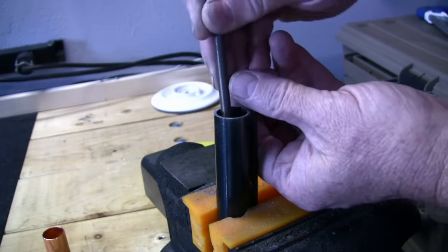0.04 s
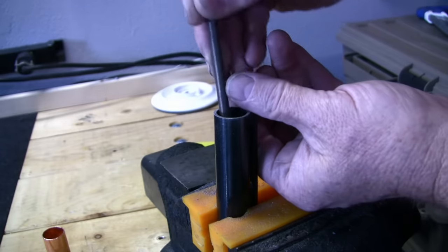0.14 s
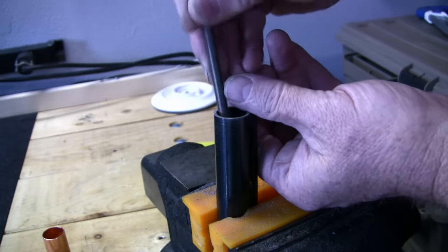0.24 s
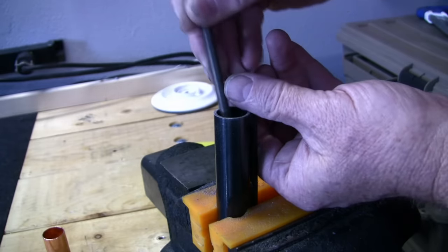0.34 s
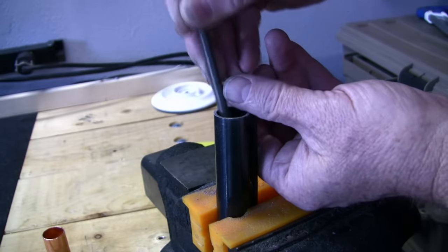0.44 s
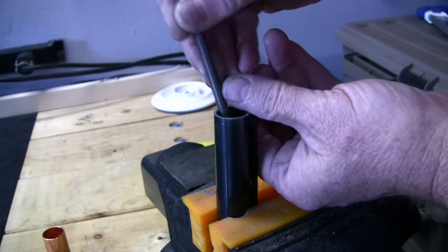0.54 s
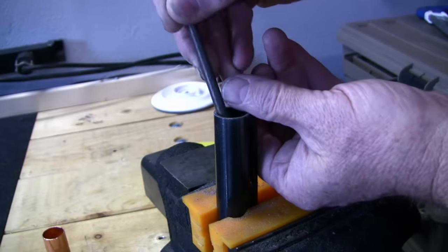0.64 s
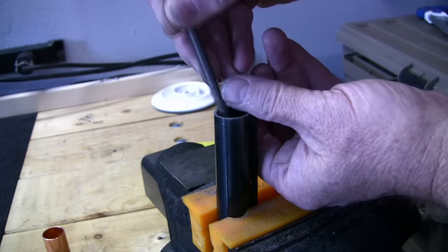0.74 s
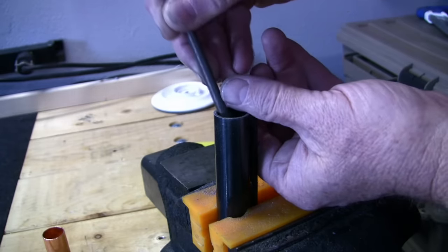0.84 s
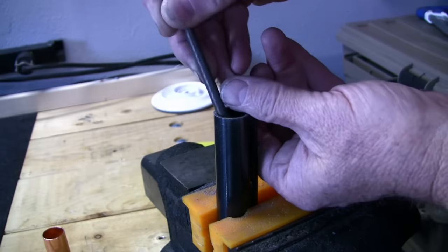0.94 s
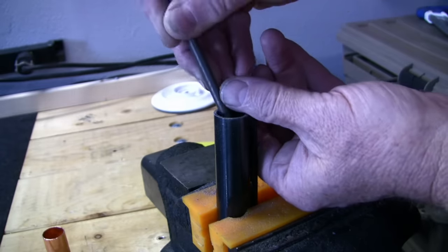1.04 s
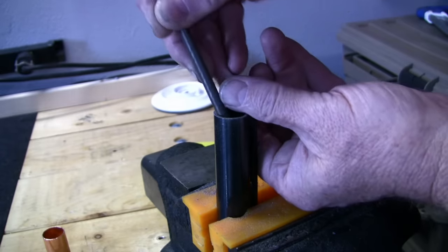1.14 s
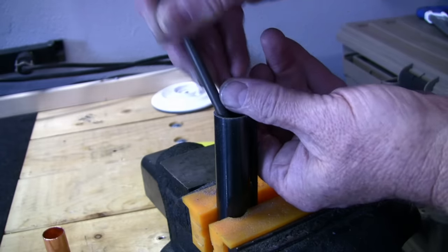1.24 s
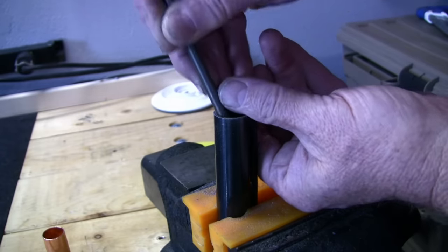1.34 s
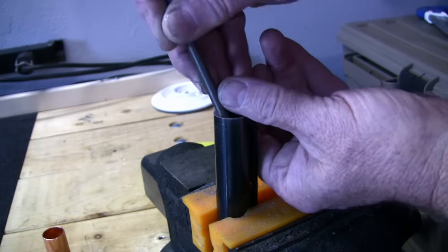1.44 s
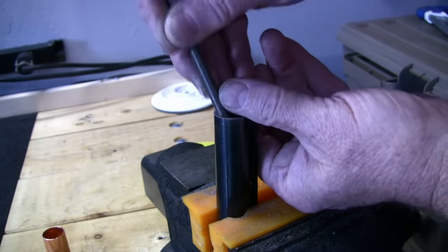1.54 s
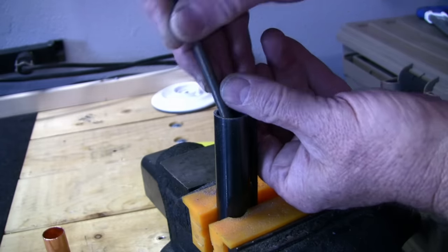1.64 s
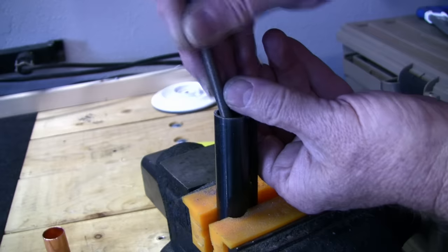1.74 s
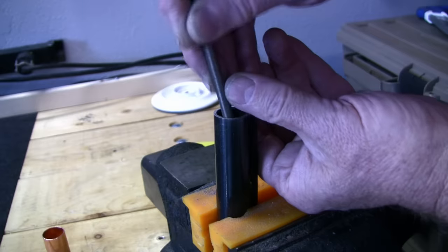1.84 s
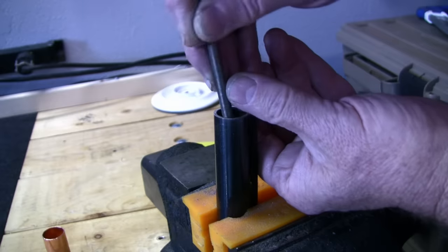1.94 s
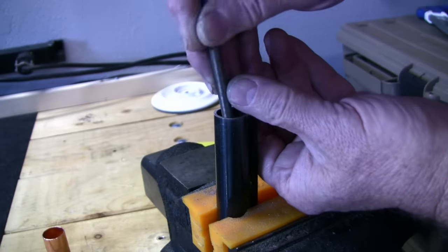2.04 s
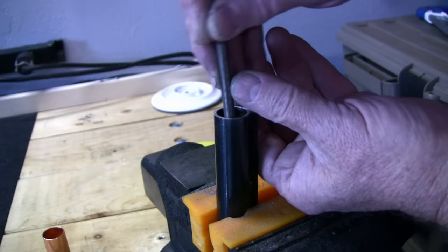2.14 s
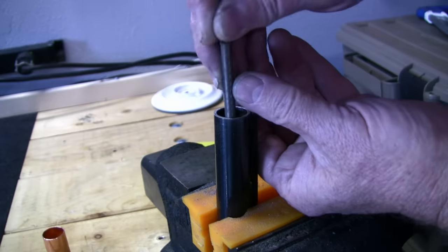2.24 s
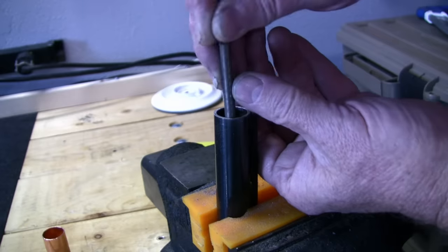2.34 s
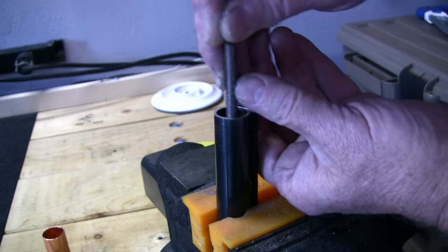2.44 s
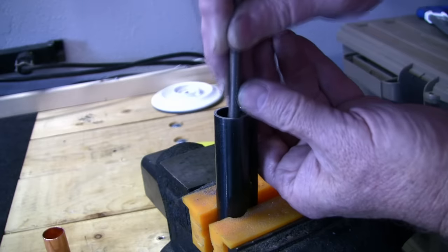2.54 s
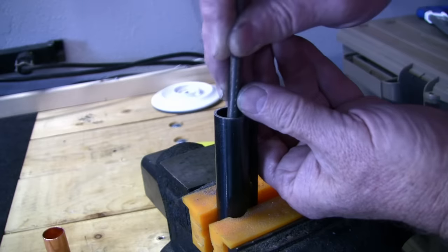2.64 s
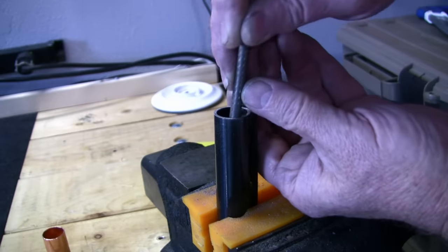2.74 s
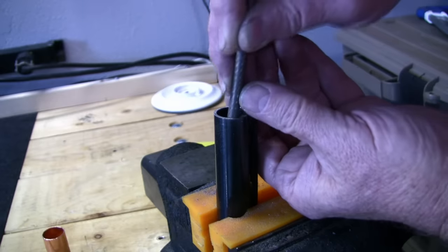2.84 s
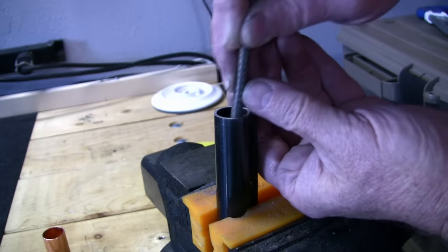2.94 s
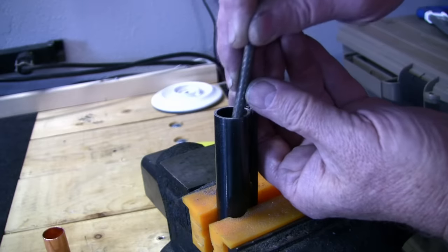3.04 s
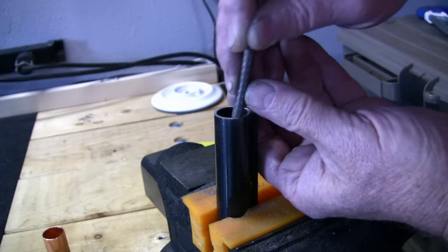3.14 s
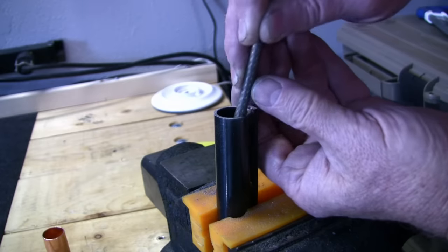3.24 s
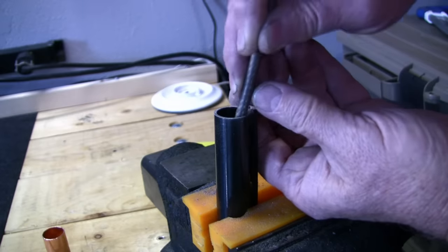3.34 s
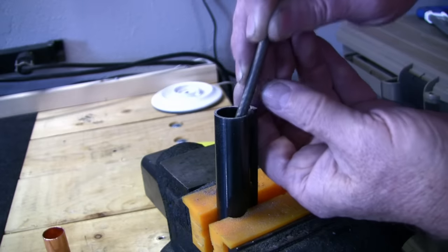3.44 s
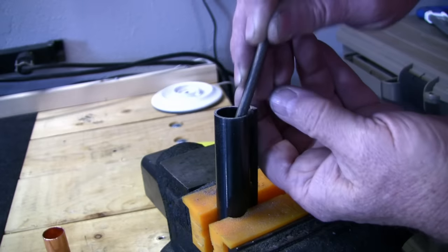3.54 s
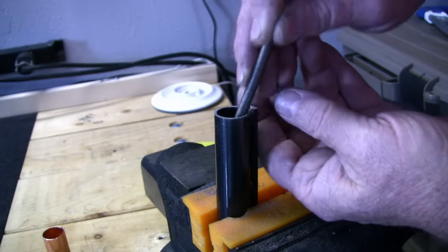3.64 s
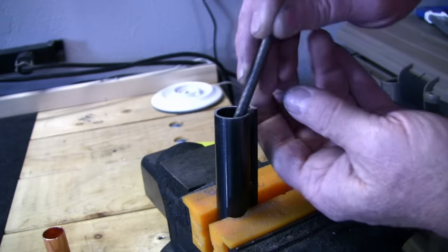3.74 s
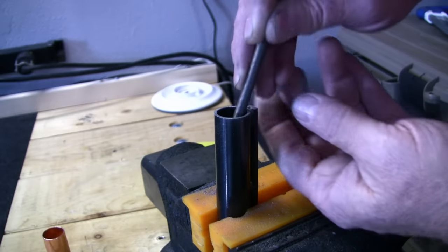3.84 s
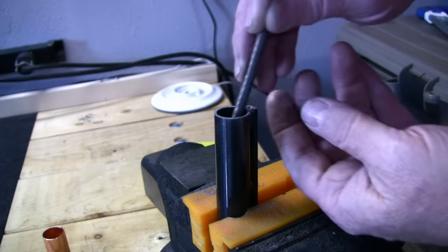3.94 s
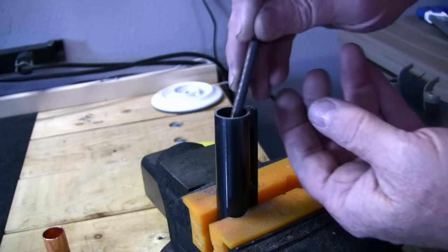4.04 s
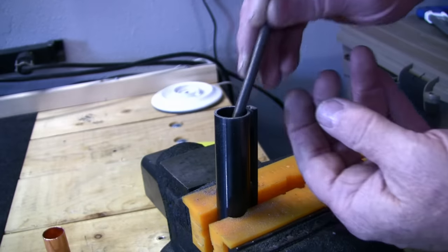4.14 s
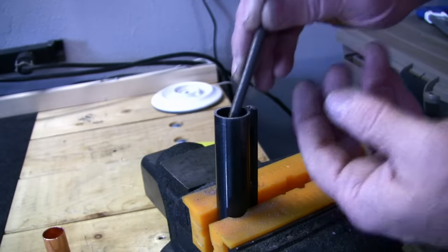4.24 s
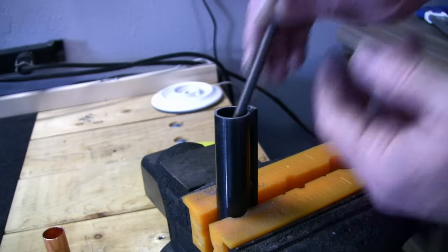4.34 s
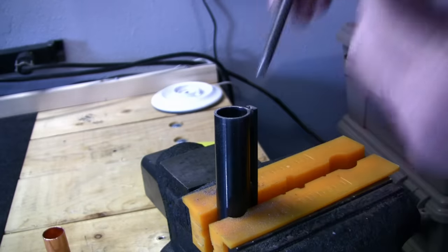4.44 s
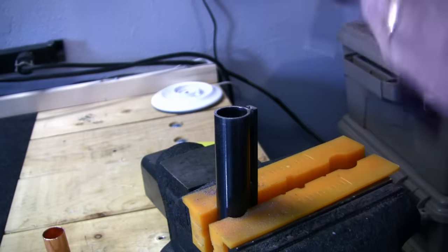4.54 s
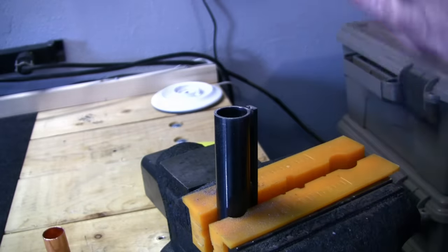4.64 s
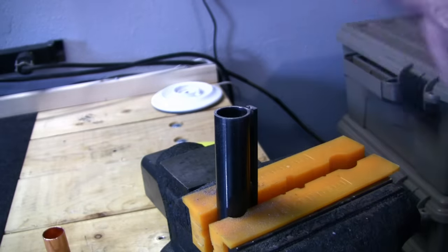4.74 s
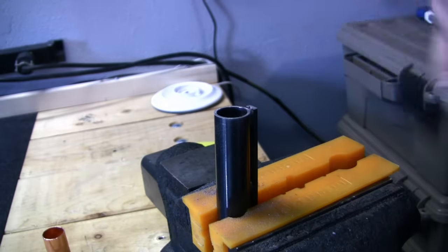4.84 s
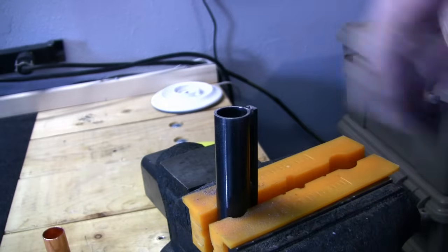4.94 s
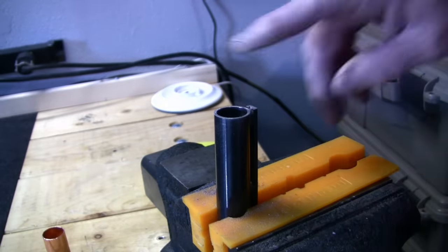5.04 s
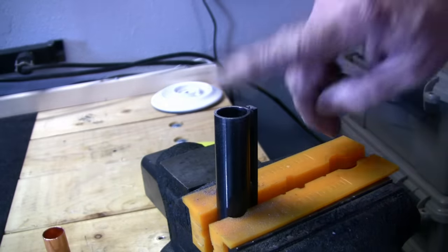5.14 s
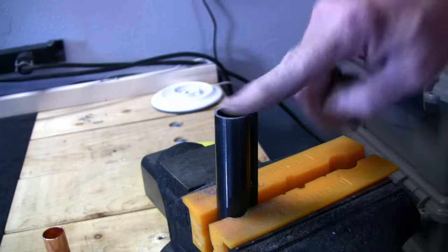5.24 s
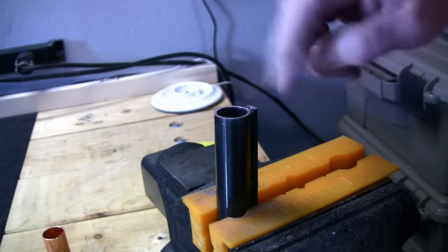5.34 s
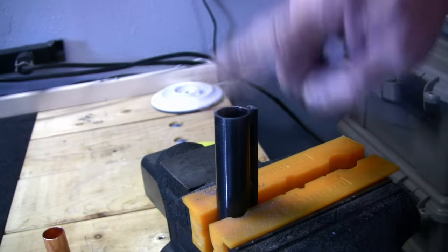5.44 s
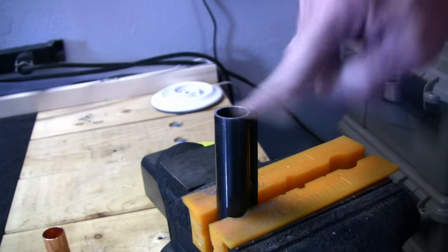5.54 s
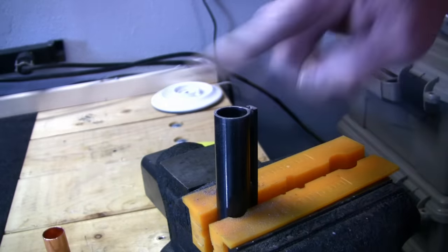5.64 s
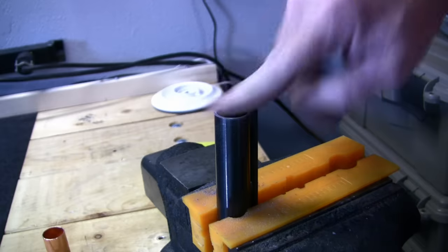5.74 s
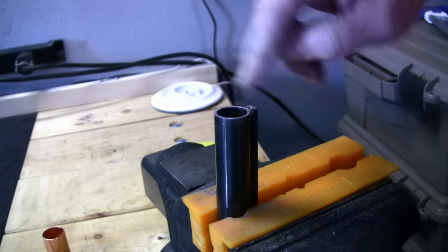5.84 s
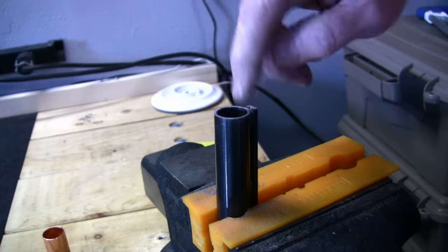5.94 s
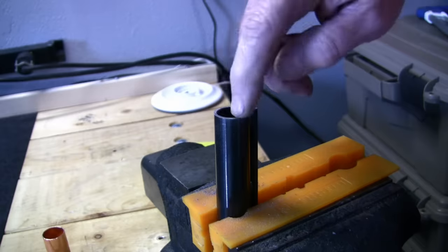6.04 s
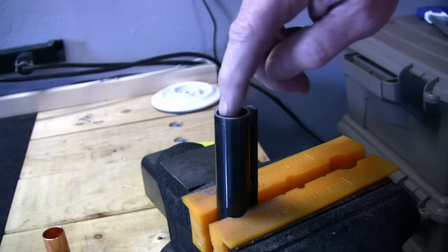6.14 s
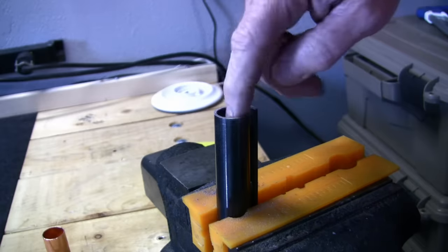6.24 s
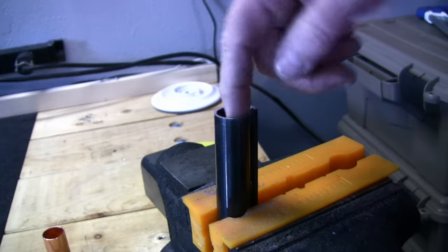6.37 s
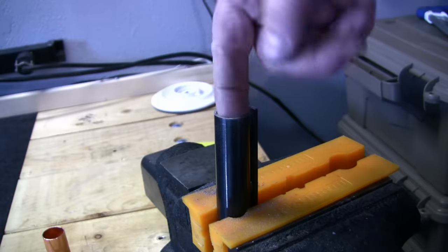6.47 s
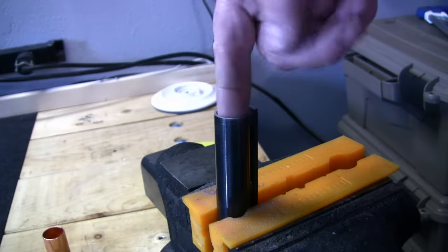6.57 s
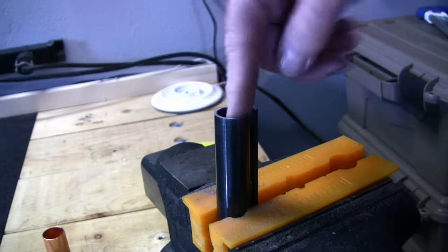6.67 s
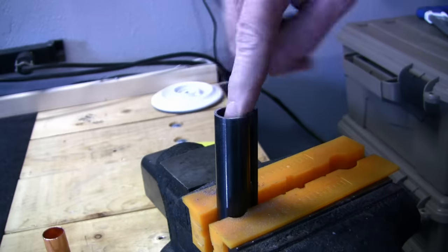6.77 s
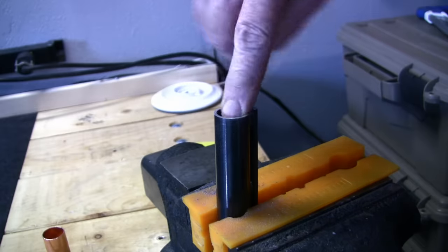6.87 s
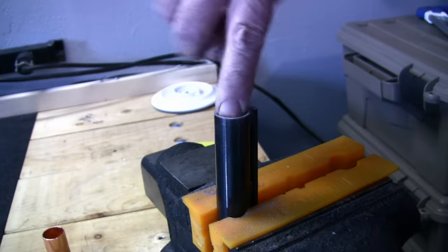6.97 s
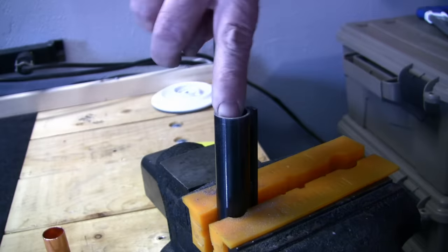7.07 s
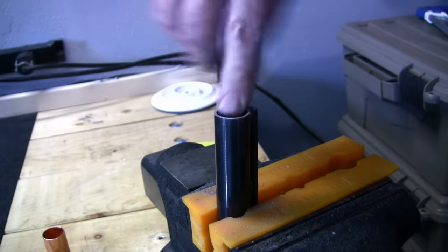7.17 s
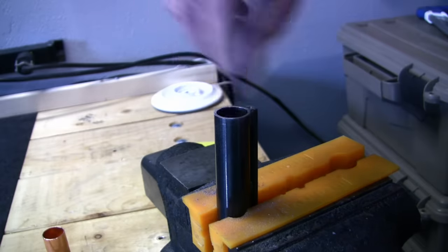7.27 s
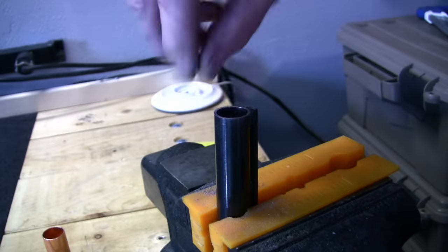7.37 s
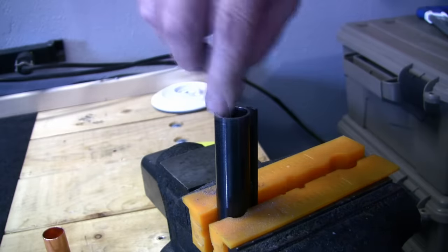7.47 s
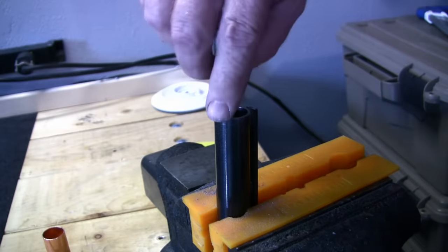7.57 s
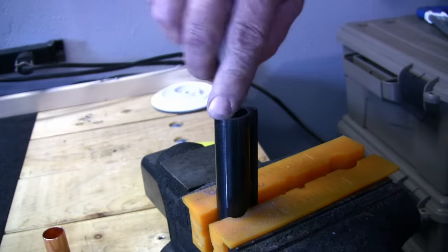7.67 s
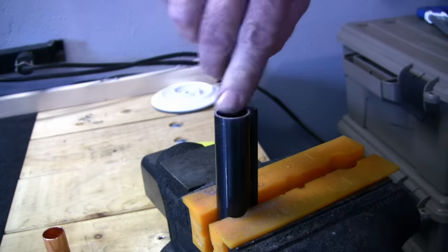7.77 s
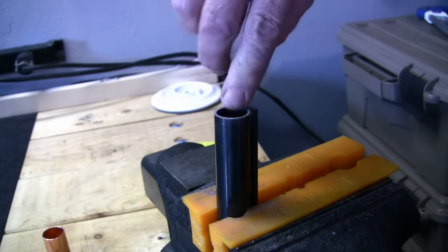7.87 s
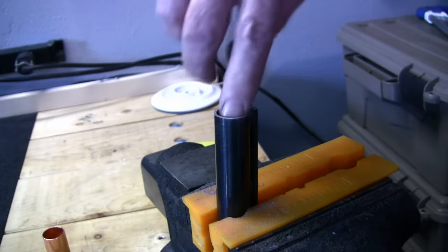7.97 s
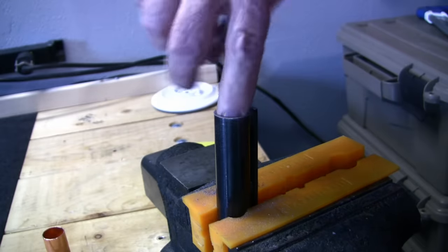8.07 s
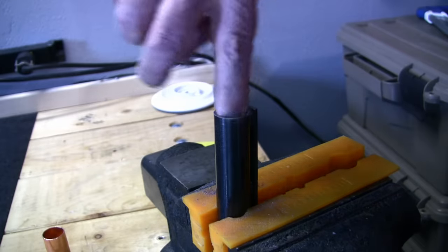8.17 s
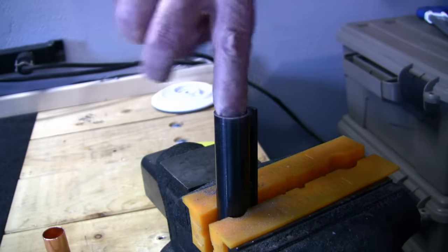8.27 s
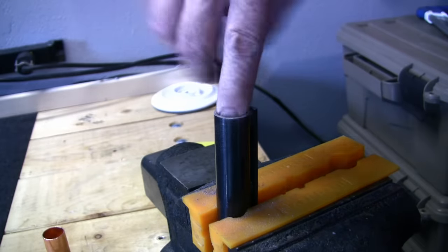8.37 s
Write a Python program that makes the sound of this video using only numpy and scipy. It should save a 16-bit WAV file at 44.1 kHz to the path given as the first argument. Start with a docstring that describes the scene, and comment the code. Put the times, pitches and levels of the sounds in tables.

```python
"""Deburring a steel tube by hand

A round hand file deburrs the rim of a steel tube clamped in a vise, close by in a small workshop.
Teeth catch and skip in quick strokes that ring the tube and shake the vise; the file is then whipped out
with one ringing scrape and a fingertip rubs over the rim. Each scrape is tooth catches and fine noise, shaped
by hand pressure and filtered by a resonant body. Shaped noise and wavering sines make rumble, hiss and hum."""
import sys
import numpy as np
from scipy import signal
from scipy.fft import rfft, irfft, next_fast_len
from scipy.io import wavfile
from scipy.ndimage import map_coordinates

SR = 44100
rng = np.random.default_rng(int(sys.argv[2]) if len(sys.argv) > 2 else 0)


def wav_out(sig):
    """Save sig, one row per channel (or a flat mono array), as 16-bit PCM at SR to the path in sys.argv[1]."""
    wavfile.write(sys.argv[1], SR, np.round(np.clip(np.atleast_2d(sig).T, -1, 1) * 32767).astype(np.int16))


N = 370881

# file strokes on the rim: (start t/s, length/s, level/dB, crest as a share of the length, thrust on the vise/dB)
STROKES = [(0.037, 0.087, -28, 0.61, -5), (.17, 0.069, -29, 0.56, 2), (.278, .08, -28, 0.51, -5),
           (0.417, .065, -35, 0.71, 5), (.527, 0.055, -28, 0.76, -6), (0.626, 0.057, -28, 0.68, 3.5),
           (0.752, .075, -29, 0.58, -6), (.945, 0.039, -29.5, 0.47, 3.5), (1.03, 0.077, -35, 0.47, 0),
           (1.208, 0.046, -26, 0.33, 1.5), (1.296, 0.052, -23.5, 0.62, -10), (1.432, .035, -29, 0.61, -4),
           (1.481, .02, -29, 0.29, 8), (1.529, .047, -25, 0.45, -7), (1.736, 0.029, -33.5, .25, 2),
           (1.792, 0.051, -32.5, 0.71, 0), (1.927, .038, -31, 0.6, 0.5), (2.003, 0.052, -24.5, 0.59, -6),
           (2.17, 0.021, -27.5, 0.63, 2.5), (2.303, 0.06, -31, 0.6, -4), (2.383, 0.042, -45.5, 0.7, 12),
           (2.642, .025, -50, .27, 12), (2.73, 0.059, -28, 0.66, 4.5), (2.88, 0.069, -24.5, 0.56, -10),
           (3.006, 0.024, -34, 0.72, 5), (3.044, .025, -26.5, 0.6, 4.5), (3.136, 0.055, -32.5, 0.26, -6),
           (3.267, .031, -26.5, .58, 4.5), (3.377, .059, -32.5, 0.37, -4.5), (3.496, 0.062, -30.5, 0.52, 7),
           (3.591, 0.072, -23.5, 0.096, -5), (3.739, 0.054, -36, .62, 9), (3.84, 0.044, -30.5, .28, -4.5),
           (3.961, 0.053, -34.5, 0.69, 7), (4.055, .066, -34, 0.58, -1), (4.191, 0.053, -38.5, 0.66, 7),
           (4.287, 0.1, -30, 0.49, -2), (4.424, 0.056, -35.5, 0.55, 3.5)]


def amp(db):
    """Decibels to gain."""
    return 10 ** (np.asarray(db) / 20)


def unit(x):
    """Scale to rms 1."""
    return x / np.sqrt(np.mean(x ** 2) + 1e-20)


def along(points, hz):
    """Read (f/Hz, value) points on a log frequency axis."""
    f, value = np.transpose(points)
    return np.interp(np.log(hz + 1), np.log(f + 1), value)


def add(track, s, x):
    """Mix x into the track at time s."""
    i = max(round(s * SR), 0)
    track[i:i + len(x)] += x[:len(track) - i]


def wobble(rate, n):
    """A smooth random curve of n samples, rate knots a second."""
    knots = rng.standard_normal(int(n * rate / SR) + 4)
    return map_coordinates(knots, [np.arange(n) * rate / SR])


def filtered(x, gain):
    """x times a gain that is a function of frequency."""
    n = x.shape[-1]
    padded = next_fast_len(n + SR // 10)
    spectrum = rfft(x, padded) * gain(np.fft.rfftfreq(padded, 1 / SR))
    return irfft(spectrum, padded)[..., :n]


def grid(size=8192):
    """The frequencies on which bodies are described."""
    return np.fft.rfftfreq(size, 1 / SR)


def filing():
    """Steel teeth bite and thrust on the tube's rim, stroke after stroke."""
    strokes = scrape(STROKES, tube_body(), rate=410, bite=.45, chips_db=3.5, entry_db=-7.5, exit_db=-13,
                     low_db=-5, body_db=1.18, treble_db=-1, body_per_db=.39, treble_per_db=.05,
                     shudder_db=-4, shift_db=3.5)
    return sheen(strokes)


def pull_out():
    """The loosely held file slides free of the tube and rings with its own resonances."""
    # the file drawn out: (start t/s, length/s, level/dB, crest as a share of the length, thrust on the vise/dB)
    withdrawal = [(4.528, 0.075, -17, 0.55, -16)]
    # broad colour of the free file: (f/Hz, level/dB)
    file_colour = [(150, -19.5), (400, -7.5), (650, -8), (1400, -6), (2400, -2.5), (4300, -9), (6000, -6.5),
                   (8500, -13), (11500, -14.5), (15000, -32.5)]
    # resonances of the free file: (f/Hz, width/Hz, height/dB)
    file_modes = [(660, 78, 13.3), (890, 130, 6.3), (1074, 110, 11.4), (2271, 60, 6), (2710, 50, 4.6),
                  (3460, 85, 7), (3720, 180, 13), (4190, 140, 14), (4874, 160, 5.5), (9900, 160, 8),
                  (11090, 220, 11)]
    return scrape(withdrawal, steel(file_colour, file_modes), rate=1200, bite=0, chips_db=3,
                  entry_db=-13.5, exit_db=-13.5, low_db=-6.5, body_db=-1, treble_db=-1.5,
                  body_per_db=0, treble_per_db=0, shudder_db=-11, shift_db=.5)


def finger():
    """Soft skin rubs on the rim and twists slowly in the bore, so the tube sounds faintly."""
    # rubs and twists: (start t/s, length/s, level/dB, crest as a share of the length, thrust on the vise/dB)
    rubs = [(5.41, .08, -56.5, 0.57, 1), (5.488, .03, -44.5, 0.5, 3.5), (5.695, .075, -53.5, 0.43, 9.5),
            (5.84, .06, -56, 0.44, -8.5), (5.925, .085, -53, 0.31, 11), (6.15, .4, -60, 0.48, -3),
            (6.845, .055, -57.5, 0.21, -6.5), (6.9, .28, -67, 0.32, -2.5), (7.36, .095, -61, 0.65, 2),
            (7.85, .045, -55, 0.53, -6.5), (7.938, .04, -53, 0.34, 8.5), (7.98, .07, -65, 0.28, 7.5),
            (8.148, 0.027, -60, .4, 2.5), (8.2, 0.16, -68, .4, 3.5)]
    # soft skin compared with steel teeth: (f/Hz, level/dB)
    skin = [(300, -3), (440, 4), (620, 2.5), (1100, 0), (2100, -3), (3600, 2.5), (4400, -1.5), (6000, -1.5),
            (10000, 0)]
    fingered_tube = tube_body() * amp(along(skin, grid()))
    return scrape(rubs, fingered_tube, rate=410, bite=.32, chips_db=3, entry_db=-9, exit_db=-7,
                  low_db=5, body_db=2, treble_db=4.5, body_per_db=.5, treble_per_db=.68,
                  shudder_db=-13, shift_db=5)


def scrape(rows, body, rate, bite, chips_db, entry_db, exit_db, low_db, body_db, treble_db, body_per_db,
           treble_per_db, shudder_db, shift_db):
    """Friction swells and fades, ringing the steel and shaking the vise; more thrust means less bite."""
    bite_per_db = .04  # share of tooth catches lost per dB of thrust
    early_crest_db = 19.5  # early crests enter harder: dB per share of the length
    release_s, shudder_rise_s = .035, .032
    out, hz = np.zeros(N), grid()
    for start, length, db, crest, thrust_db in rows:
        share = np.clip(bite - bite_per_db * thrust_db, 0, 1)
        touch = .013 * np.clip(1 - share, .1, 1)  # s; a gliding file eases in, a biting one takes hold abruptly
        t = start - touch + np.arange(int((touch + length + release_s) * SR)) / SR
        stroke_entry_db = entry_db + early_crest_db * (.5 - crest)
        pressure = press(t, start, length, crest, stroke_entry_db, exit_db, touch, release_s)
        force = teeth(len(t), share, rate, scatter=.35, spread_db=3.5, chips_db=chips_db) * pressure
        force *= amp(db) * np.sqrt(length * SR / np.sum(force ** 2))

        full_db = body_db + body_per_db * thrust_db
        bright_db = treble_db + treble_per_db * thrust_db
        tone = along([(25, low_db - 8.5), (120, low_db), (330, low_db), (600, full_db), (1200, full_db),
                      (2000, 0), (4800, .0013), (8000, bright_db)], hz)
        # the contact point travels, so one set of overtones gives way to another
        turn = np.pi / 2 * np.clip((t - start) / length, 0, 1)
        for weight in (np.cos(turn) ** 2, np.sin(turn) ** 2):
            shift = np.interp(hz, np.geomspace(400, SR / 2, 48), rng.standard_normal(48))
            overtones = unit(amp(shift_db * shift * (hz > 500)))
            response = ring(body * amp(tone) * overtones)
            add(out, t[0], signal.fftconvolve(force * weight, response))
        # the load lets go: the shudder peaks as the stroke ends
        recoil = amp(db + thrust_db + shudder_db) * shudder(shudder_rise_s, t60=.17)
        add(out, start + length - shudder_rise_s, recoil)
    return out


def press(t, start, length, crest, entry_db, exit_db, touch, release):
    """Pressure of one stroke: it touches down, rises to a rounded crest, eases off and lifts."""
    away = np.interp(t, [start, start + crest * length, start + length], [-1, 0, 1])
    swing_db = np.where(away < 0, entry_db, exit_db) * np.abs(away) ** 1.5
    contact_times = [start - touch, start, start + length, start + length + release]
    contact_db = np.interp(t, contact_times, [-23, 1.5, 1.5, -34.5])
    return amp(swing_db + contact_db)


def teeth(n, share, rate, scatter, spread_db, chips_db):
    """Cutting force: teeth catch at an uneven pace over a crackle of fine chips."""
    # the harder the teeth bite, the longer each one holds
    gaps = np.exp(scatter * rng.standard_normal(n // 20)) * (1 + share) / rate
    times = np.cumsum(gaps) - gaps[0] / 2
    catches = np.zeros(n)
    for s in times[times < n / SR]:
        size = amp(spread_db * np.clip(rng.standard_normal(), -2, 1))
        add(catches, s, size * rattle(life=.0008))
    chips = rng.standard_normal(n) * amp(chips_db * np.clip(wobble(700, n), -2, 1.3))
    return np.sqrt(share) * unit(catches) + np.sqrt(1 - share) * unit(chips)


def rattle(life):
    """A tooth does not let go cleanly: a tiny noise burst of slips with unit energy, life in s."""
    t = np.arange(SR // 125) / SR
    burst = rng.standard_normal(len(t)) * np.sqrt(t) * np.exp(-t / life)
    return burst / np.linalg.norm(burst)


def steel(colour, modes):
    """Gain of a steel body: resonances on a broad colour, normalised by its power in the rasping band."""
    hz = grid()
    peaks_db = sum(db / (1 + (2 * (hz - f) / width) ** 2) for f, width, db in modes)
    gain = amp(along(colour, hz) + peaks_db)
    rasping = (hz > 1800) & (hz < 5000)
    return gain / np.sqrt(np.mean(gain ** 2 * rasping))


def tube_body():
    """Gain of the clamped tube with the file pressed on it."""
    # broad colour: (f/Hz, level/dB)
    tube_colour = [(100, -7.5), (200, -10), (300, -1), (520, -15.5), (800, -1.5), (1700, -2.5), (2400, 1),
                   (4300, -12.5), (6400, -12), (7800, -18), (11500, -17.5), (13500, -26), (15000, -48.5)]
    # resonances: (f/Hz, width/Hz, height/dB)
    tube_modes = [(266, 95, 8.9), (396.6, 26, 12.2), (464.4, 54, 13.7), (591, 93, 18.7), (695, 33, 4.0),
                  (896, 142, 6.86), (1092, 115, 8.2), (1241, 95, 6.9), (1464, 32, 8.3), (1581, 16, 9),
                  (1923, 117, 8.75), (2060, 62, 7.1), (2280, 55, 2.7), (2490, 270, 2.8), (2853, 200, 4.9),
                  (3092, 83, 4.6), (3706, 230, 7.6), (3995, 260, 8.3), (4264, 260, 9.8), (4446, 210, 6.5),
                  (5110, 420, 7.9), (6230, 540, 6.5), (10130, 380, 9.8)]
    return steel(tube_colour, tube_modes)


def ring(gain, travel=.000865):
    """Causal impulse response of a gain; low bending waves arrive later (travel: s at about 1 kHz)."""
    # folding the cepstrum gives minimum phase
    cepstrum = irfft(np.log(np.maximum(gain, 1e-6)))
    half = len(cepstrum) // 2
    cepstrum[1:half] *= 2
    cepstrum[half + 1:] = 0
    bending = 4 * np.pi * travel * np.sqrt(1000 * (grid() + 100))
    return irfft(np.exp(rfft(cepstrum) - 1j * bending))[:half]


def shudder(rise, t60):
    """The vise springs back and trembles: low noise that swells for rise s, then dies away."""
    # colour of the vise on its bench: (f/Hz, level/dB)
    vise = [(20, -50), (45, -21.5), (110, -17), (200, -15), (270, 2.5), (330, -6.5), (400, -7.5),
            (520, -18), (1000, -37), (3000, -85)]
    t = np.arange(SR // 3) / SR
    swell = np.minimum(t / rise, 1) * amp(-60 * np.maximum(t - rise, 0) / t60)
    return swell * unit(filtered(rng.standard_normal(len(t)), lambda hz: amp(along(vise, hz))))


def sheen(strokes):
    """The top treble of the filing drifts by a few dB and is brightest towards the end."""
    # gain of the top treble: (t/s, level/dB)
    top_treble = [(0.2, -1.5), (1.3, 0), (2.05, 1.5), (2.4, -0.5), (3.35, -2), (3.8, 2), (4.4, 2)]
    s, db = np.transpose(top_treble)
    top = filtered(strokes, lambda hz: np.interp(hz, [5500, 8500], [0, 1]))
    return strokes + (amp(np.interp(np.arange(N) / SR, s, db)) - 1) * top


def snags():
    """A tooth or a fingernail hooks on the edge and snaps free with one sharp tick of the tube."""
    # single hard snags: (t/s, level/dB)
    snag_hits = [(0.2837, -12.5), (0.5255, -18), (0.734, -17.5), (1.484, -7.5), (1.5356, -5.5),
                 (1.8254, -12.5), (2.0095, -10), (2.0675, -12), (2.3013, -14.5), (2.326, -5.5),
                 (2.3401, -10.5), (2.8747, -9), (2.9294, -5), (3.056, -9), (3.138, -13.5), (3.264, -16.5),
                 (3.3995, -12.5), (3.4077, -10.5), (3.6566, -5), (3.84, -9.5), (4.727, -23.5),
                 (5.4192, -36), (5.5064, -27), (6.852, -35), (7.8535, -35), (8.1566, -39)]
    blows = np.zeros(N)
    for s, db in snag_hits:
        add(blows, s, amp(db + 8) * rattle(life=.0007))
    tone = along([(300, -22.5), (1200, -4), (4000, 1.5), (10000, .5)], grid())
    return signal.fftconvolve(blows, ring(tube_body() * amp(tone)))[:N]


def ring_out():
    """As file or fingertip leaves the rim, modes of tube and air column swell and then die away."""
    # ringing tones: (peak t/s, f/Hz, level/dB, t60/s)
    ringing_tones = [(4.566, 3640, -11, 0.097), (4.594, 865.5, -15.5, .125), (4.598, 10060, -35, 0.19),
                     (5.507, 649, -46, .12), (5.957, 621, -36.5, 0.079), (7.958, 980, -37, .11)]
    out, t = np.zeros(N), np.arange(SR // 2) / SR
    rise = .024  # s
    for s, hz, db, t60 in ringing_tones:
        swell = np.minimum(t / rise, 1) ** 2 * amp(db - 60 * np.maximum(t - rise, 0) / t60)
        tone = np.sin(2 * np.pi * hz * t + .65 * wobble(90, len(t)))
        add(out, s - rise, swell * tone)
    return out


def motion(t60):
    """File movement: each stroke's level, held from one length before its start to its end, then decaying."""
    t = np.arange(N) / SR
    return np.max([amp(db - 60 * np.maximum(t - start - length, 0) / t60) * (t > start - length)
                   for start, length, db, _, _ in STROKES], axis=0)


def drag():
    """A faint, uneven graze of the file on the rim, under and between the strokes."""
    graze_db, rest_t60_s = -21.5, 1.3  # level against the strokes; how slowly the file comes to rest
    graze = rng.standard_normal(N) * unit(amp(5.8 * wobble(21, N) + 3.5 * wobble(300, N)))
    graze *= amp(graze_db) * motion(rest_t60_s)
    tone = along([(300, 9.5), (1000, 4.5), (2500, -1), (10000, -8)], grid())
    return signal.fftconvolve(graze, ring(tube_body() * amp(tone)))[:N]


def bumps():
    """The hand nudges the tube and the vise answers dully."""
    # soft bumps: (t/s, level/dB)
    bump_hits = [(5.499, -50), (5.73, -49), (5.917, -31), (5.955, -48), (7.953, -50)]
    out = np.zeros(N)
    for s, db in bump_hits:
        add(out, s - .008, amp(db) * shudder(rise=.0047, t60=.14))
    return out


def bench(x, echo_db):
    """Bench top, vise and hands throw back a few weak, bright copies within milliseconds."""
    out = x.copy()
    copy = filtered(x, lambda hz: np.clip(hz / 2500, 0, 1) ** 2)
    for delay, db in [(.0011, -3), (.0019, 1), (.0031, -5), (.0047, -1)]:
        add(out, delay * rng.uniform(.9, 1.1), amp(echo_db + db) * copy)
    return out


def workshop(x, wet_db, side_db):
    """Decaying noise tails answer from bench and walls; left and right differ most in the treble."""
    # reverberation: (f/Hz, t60/s)
    room = [(150, .35), (800, 0.39), (3000, 0.23), (7000, 0.18), (14000, 0.23)]
    # left minus right: (f/Hz, level/dB)
    tilt = [(60, -2), (200, 0.2), (1000, -0.2), (2400, -.6), (8000, -.6), (12000, -0.6)]
    hz, t, bins = signal.stft(rng.standard_normal((2, SR // 2)), SR, nperseg=256)
    decay = amp(-60 * t / along(room, hz)[:, None])
    tails = signal.istft(bins * decay, SR, nperseg=256)[1]
    tails = np.pad(tails / np.linalg.norm(tails[0]), ((0, 0), (int(.005 * SR), 0)))
    echo, side_echo = signal.fftconvolve(x[None], tails, axes=1)[:, :N]
    mid = x + amp(wet_db) * echo
    # a short noise smear and the second room tail differ between left and right, most in the treble
    smear = signal.fftconvolve(x, rattle(life=.002))[:N]
    side_colour = [(200, 0), (1000, -14.5), (4000, -5.5), (8000, 1.5), (12000, 7.5)]
    side = filtered(smear + amp(-14) * side_echo, lambda f: amp(side_db + along(side_colour, f)))
    halves = np.array([[.5], [-.5]])
    return filtered(np.array([mid + side, mid - side]), lambda f: amp(halves * along(tilt, f)))


def rumble():
    """Low noise: a steady drone, dull knocking that follows the filing, and separate swells."""
    # swells: (peak t/s, half width/s, level/dB)
    low_swells = [(3.05, 0.056, -43), (3.42, .04, -43), (3.77, .06, -46), (5.0, 0.0196, -47.5),
                  (6.3, 0.074, -54), (7.53, 0.13, -48)]
    drone_db, handling_db = -61.5, -56
    t = np.arange(N) / SR

    def low_noise(colour):
        """Noise of a given (f/Hz, level/dB) colour at rms 1."""
        return unit(filtered(rng.standard_normal(N), lambda hz: amp(along(colour, hz))))

    drone = low_noise([(20, -30.5), (50, -11.5), (72, -1), (95, -15), (120, -8), (250, -37.5), (800, -90)])
    knocking = low_noise([(20, -18.5), (50, -11), (80, -2), (130, 1), (200, -7), (400, -32.5), (800, -70)])
    swelling = low_noise([(20, -25), (50, -17), (74, 4), (110, -9), (200, -20), (400, -18), (600, -41),
                          (1500, -55)])
    handling = unit(np.sqrt(motion(t60=.87)))
    swells = sum(amp(db) * np.exp(-((t - s) / width) ** 2) for s, width, db in low_swells)
    return amp(drone_db) * drone + amp(handling_db) * handling * knocking + swells * swelling


def background():
    """Room noise and hiss from coloured noise, with hum and a thin whine from wavering sines."""
    # colour of the room noise: (f/Hz, relative level/dB)
    air = [(15, -36), (25, -16.5), (75, -3), (101, -14), (156, -9), (179, -13.5), (260, -13.5), (584, -24),
           (633, -23), (875, -23.5), (1000, -25.5), (1240, -24), (1670, -29.5), (3650, -31.5), (15600, -45)]
    # hum and whine lines: (f/Hz, relative level/dB)
    hum_lines = [(75.4, -58.5), (150.7, -63), (963.6, -74), (3898, -78), (4194, -78.5), (4495, -84),
                 (4797, -76.5), (5093, -78), (5394, -77), (5696, -77), (5992, -89), (10029, -86)]
    t = np.arange(N) / SR
    mid, side = unit(filtered(rng.standard_normal((2, N)), lambda hz: amp(along(air, hz))))
    side_colour = [(30, -5), (150, -12), (1000, -35.5), (8000, -6)]
    side = filtered(side, lambda hz: amp(along(side_colour, hz)))
    hum = np.zeros(N)
    for hz, db in hum_lines:
        level = amp(db + .89 * wobble(2, N)) * np.sqrt(2)
        hum += level * np.sin(2 * np.pi * hz * t + .5 * wobble(6, N))
    return amp(-54.5) * np.array([mid + side, mid - side]) + amp(-.5) * hum


def scene():
    """Filing, the pull-out and the fingertip on the rim, in the workshop."""
    scrapes = filing() + pull_out() + finger() + snags()
    near = bench(scrapes, echo_db=-17) + ring_out() + drag() + bumps()
    noise_floor = (background() + rumble()) * amp([[-.3], [.3]])  # leans slightly to the right
    return workshop(near, wet_db=-9.5, side_db=-16.5) + noise_floor


def record(dry):
    """The very highest peaks are rounded off and nothing above the band limit is kept."""
    top_hz = 15800
    rounded = dry / (1 + np.abs(dry / .9) ** 6) ** (1 / 6)
    return filtered(rounded, lambda hz: hz < top_hz)


dry = scene()
out = record(dry)
wav_out(out)
```